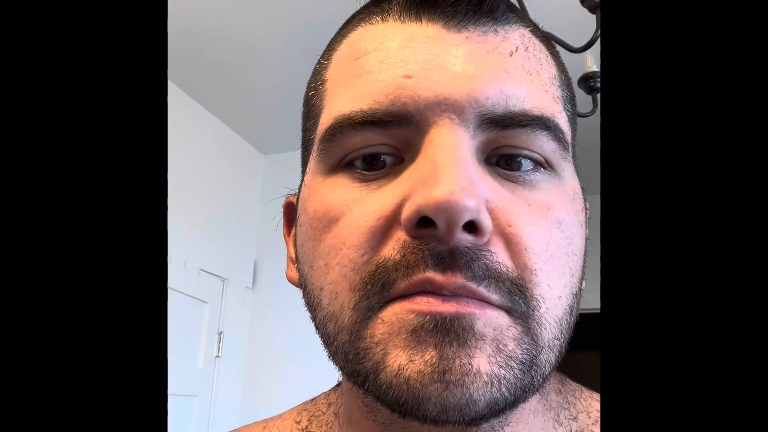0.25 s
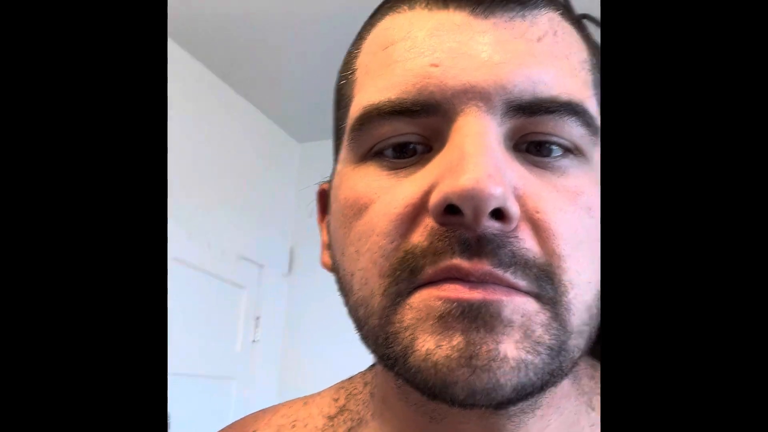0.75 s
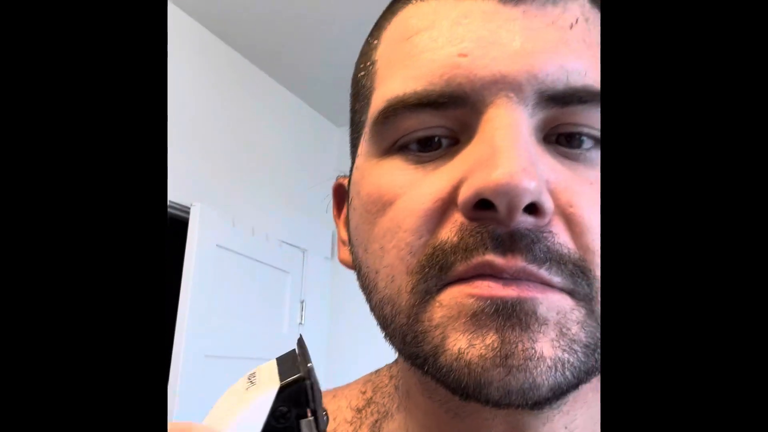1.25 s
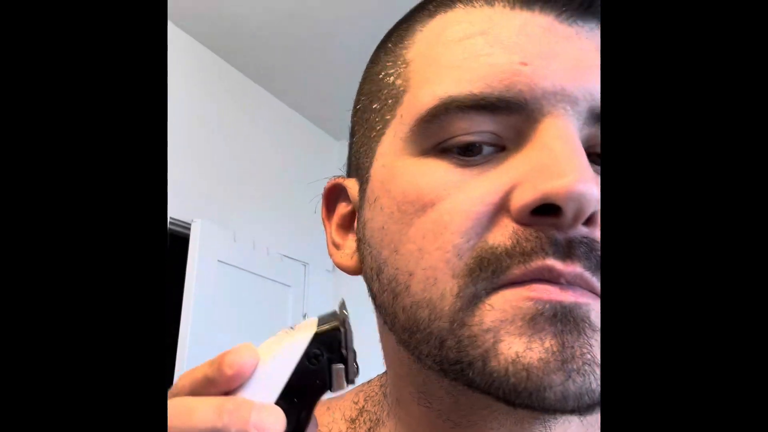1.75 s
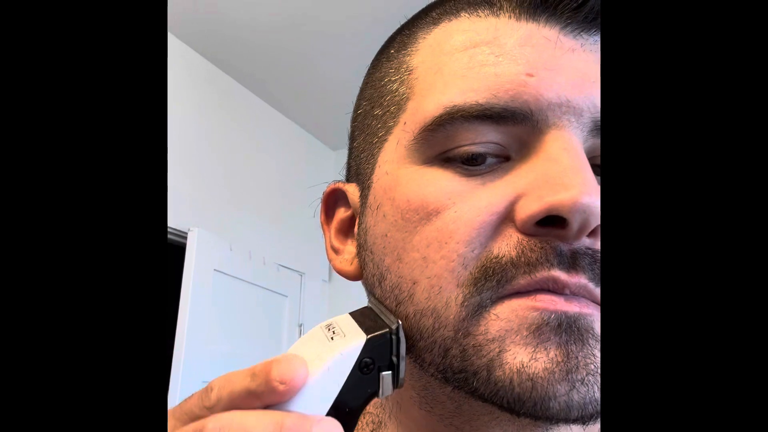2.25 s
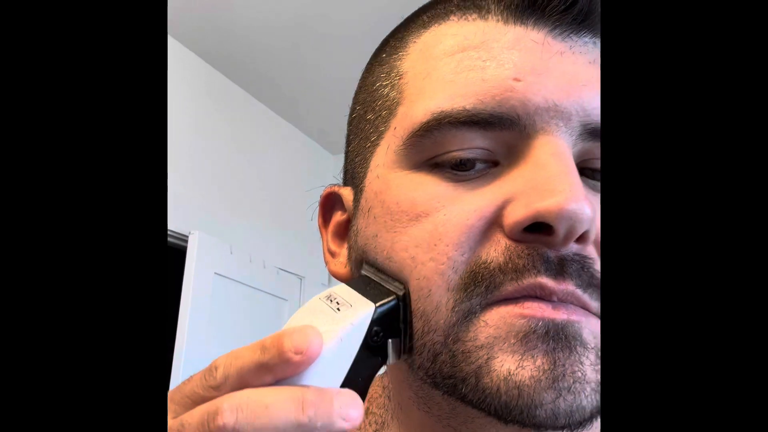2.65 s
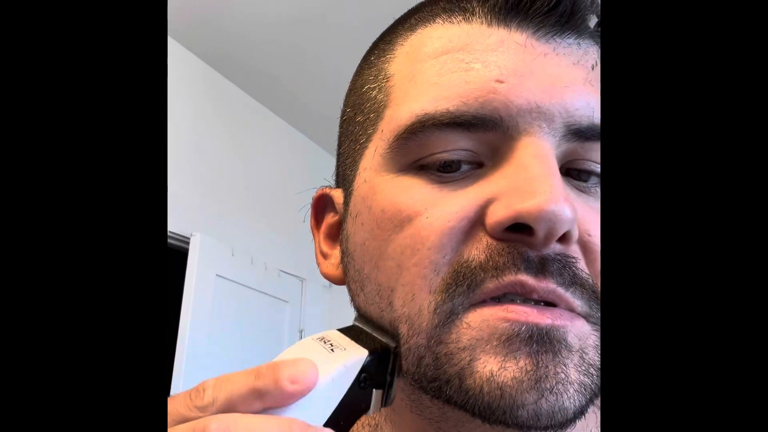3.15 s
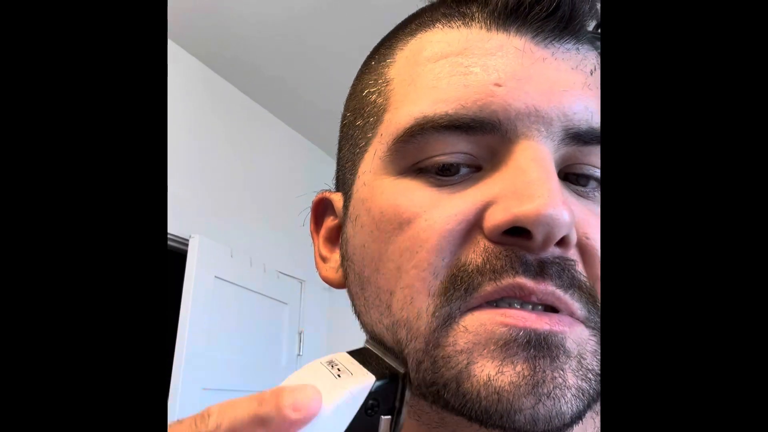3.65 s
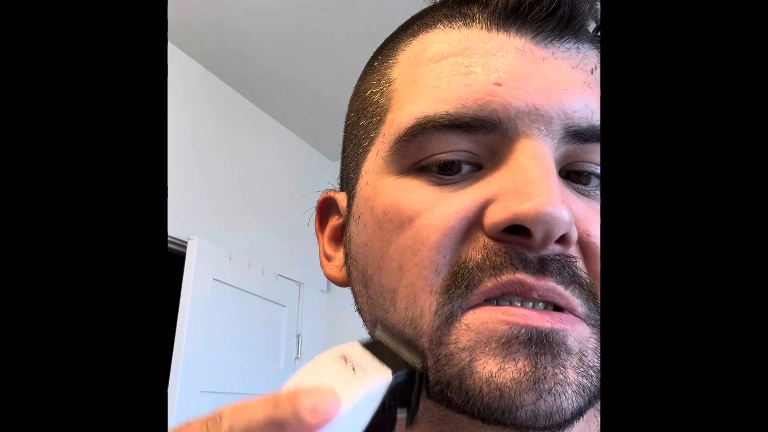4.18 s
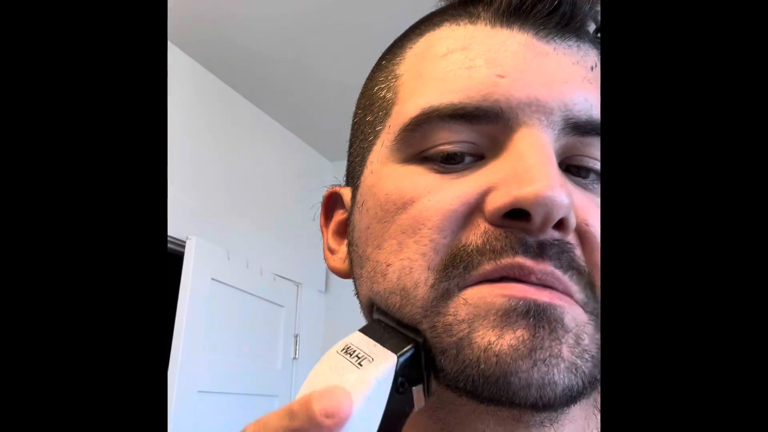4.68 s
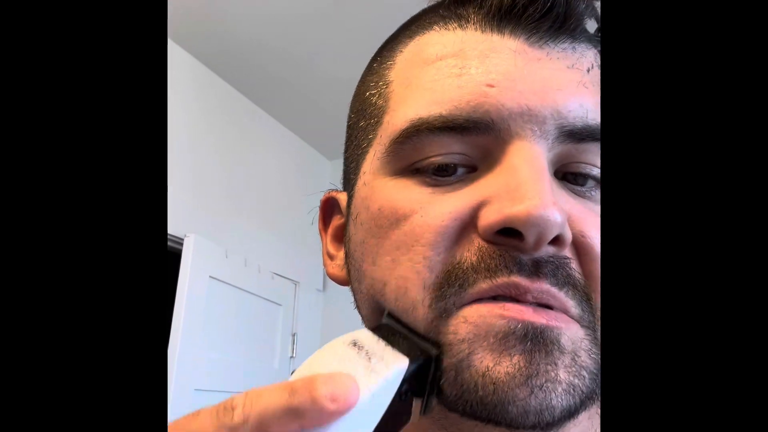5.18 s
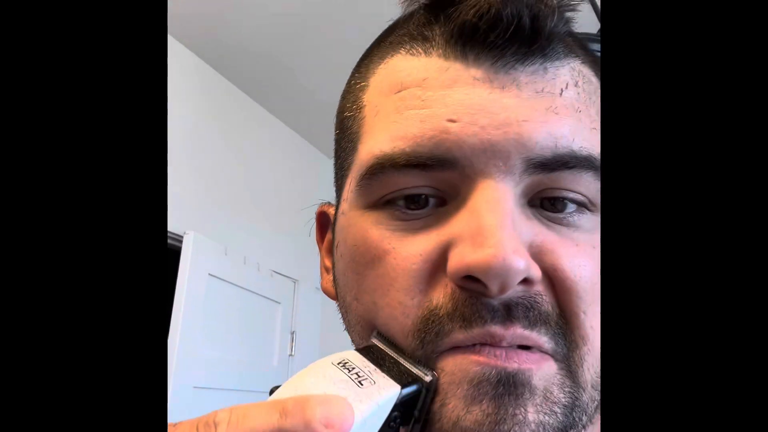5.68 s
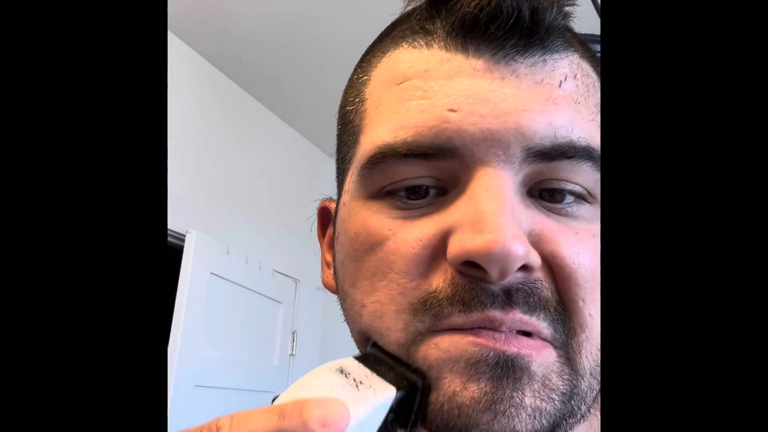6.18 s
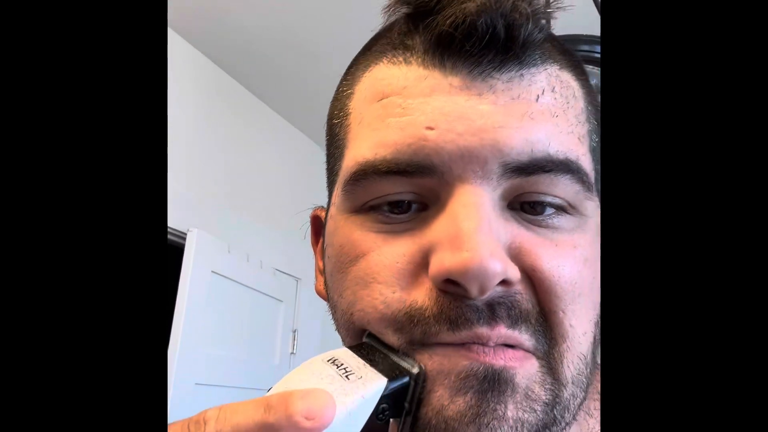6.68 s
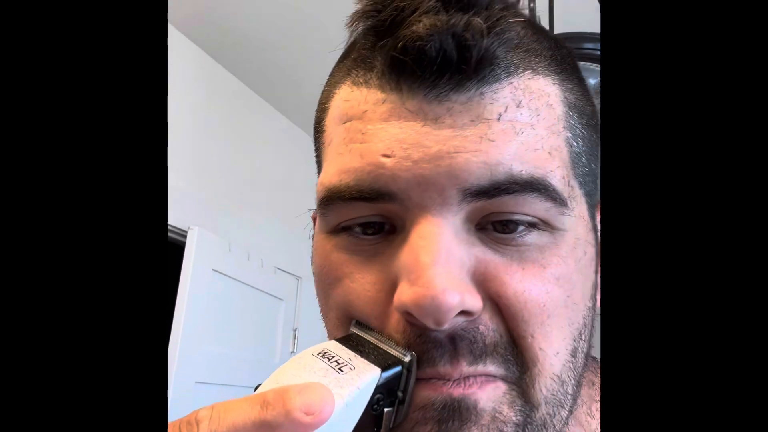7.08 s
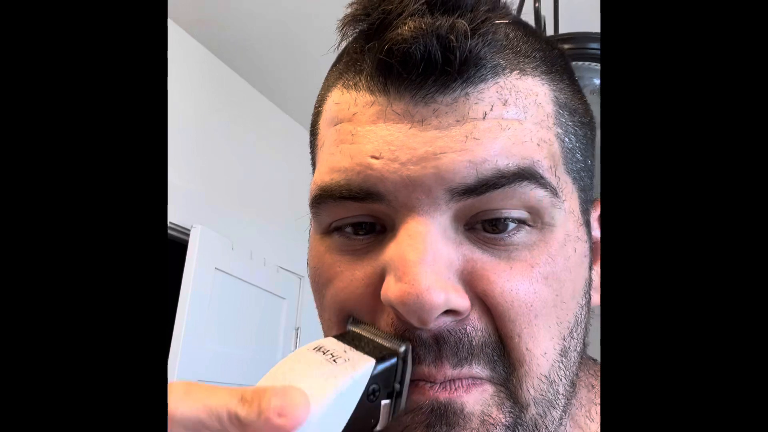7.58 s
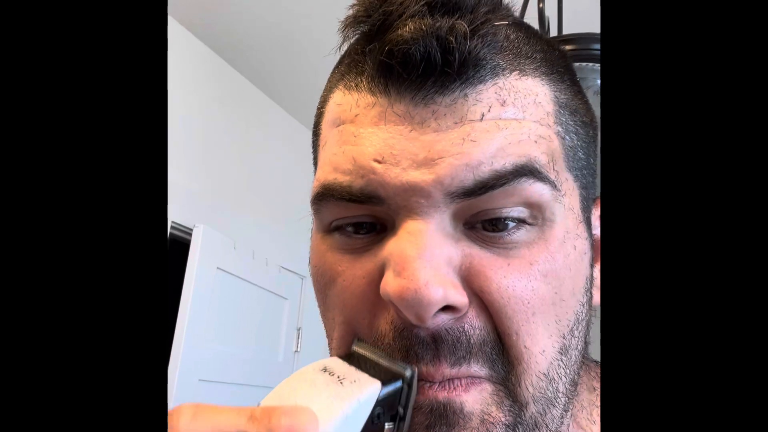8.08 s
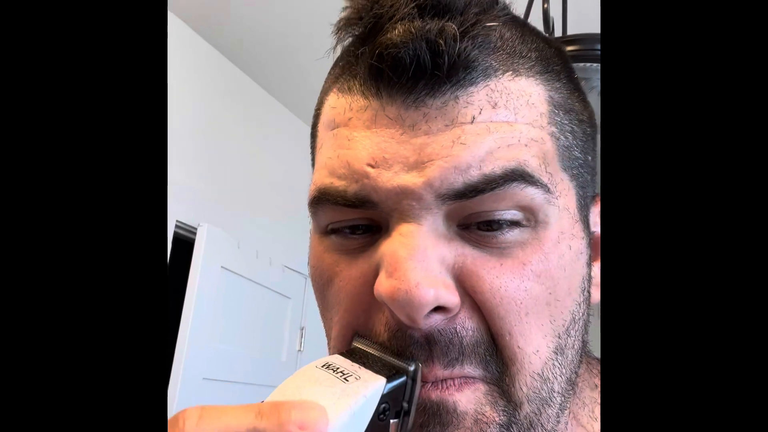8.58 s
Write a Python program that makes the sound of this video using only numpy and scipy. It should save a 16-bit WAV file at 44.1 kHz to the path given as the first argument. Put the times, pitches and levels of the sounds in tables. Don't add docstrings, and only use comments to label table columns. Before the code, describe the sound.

Electric hair clippers buzz loudly beside the microphone, swing away, then stroke through a beard with crackling, rasping hair in a small hard room.

```python
import sys
import numpy as np
from scipy import signal
from scipy.fft import rfft, irfft, next_fast_len
from scipy.io import wavfile
from scipy.ndimage import uniform_filter1d

SR = 44100
rng = np.random.default_rng(int(sys.argv[2]) if len(sys.argv) > 2 else 0)


def invert_db(x):
    u = np.asarray(x, float) / 20
    return 10 ** u


def int16_out(signal):
    q = np.round(np.clip(np.atleast_2d(signal).T, -1, 1) * 32767)
    wavfile.write(sys.argv[1], SR, q.astype(np.int16))


N = 389844
STROKE_HZ = 119.96
SOUND_M_S = 343


def evened(x):
    return x / np.sqrt(np.mean(abs(x) ** 2) + 1e-20)


def read(points, hz):
    f, value = np.transpose(points)
    return np.interp(np.log(hz + 1), np.log(f + 1), value)


def curves(rows, t):
    s, *columns = np.transpose(rows)
    return [np.interp(t, s, column) for column in columns]


def plateau(t, start, held, rise, fall):
    return -rise * np.maximum(start - t, 0) - fall * np.maximum(t - start - held, 0)


def drift(shape, span):
    size = max(round(span), 1)
    return evened(uniform_filter1d(uniform_filter1d(rng.standard_normal(shape), size), size))


def colour(x, points):
    gain = np.log(invert_db(read(points, abs(np.fft.fftfreq(4096, 1 / SR)))))
    response = np.fft.ifft(np.exp(gain - 1j * signal.hilbert(gain).imag)).real[:2048]
    return signal.oaconvolve(x, response)[:N]


def shaped_noise(points):
    gain = invert_db(read(points, np.fft.rfftfreq(N, 1 / SR)))
    return evened(irfft(rfft(rng.standard_normal(N)) * gain, N))


def resonate(x, hz, width):
    turn = np.exp(2j * np.pi * np.cumsum(hz * np.ones(len(x))) / SR)
    r = np.exp(-np.pi * width / SR)
    return 2 * (turn * signal.lfilter([1 - r], [1, -r], x / turn + 1e-18)).real


# (time [s], grip [0-3])
GRIP = [
    (0, 0),
    (.35, 0),
    (.55, 1),
    (1.54, 1),
    (1.62, 2),
    (2.25, 2),
    (2.45, 3),
    (8.84, 3),
]


def by_grip(values, t):
    return np.interp(curves(GRIP, t)[0], range(len(values)), values)


def closeness(t):
    return np.maximum(1 - curves(GRIP, t)[0], 0)


# (time [s], armature hum [dB], knock of casing and blades [dB])
HAND = [(0, -34.5, -16.5), (.15, -39.5, -18.5), (.33, -40.5, -23), (.4, -42, -32.5), (.47, -43.5, -37),
        (.6, -41.5, -43), (.95, -43.5, -42.5), (1.3, -41, -39.5), (1.54, -38.5, -41.5), (1.64, -41, -46),
        (2.2, -41.5, -45), (3.15, -42.5, -46.5), (4.1, -41, -44), (5.2, -40.5, -42.5), (6.2, -38, -40.5),
        (6.9, -37, -39.5), (7.6, -36, -39), (8.84, -35.5, -37)]


def hand_db(t):
    return curves(HAND, t)


# (time [s], from the casing [m], from the blades [m])
PATH = [(.34, 0, 0), (.6, .6, .14), (2.3, .6, .1), (2.6, .75, -.15), (5.6, .8, -.22), (7.7, .43, -.36),
        (8.84, .43, -.36)]


def extra_path_m(t):
    return curves(PATH, t)


IDLE_DB = [
    -15.,
    -13.5,
    -14.,
    -9.,
]
# (time of full cut [s], held [s], level [dB])
STROKES = [(2.44, 0.31, -45), (3.11, 0.02, -45.5), (3.29, 0.071, -41.5), (3.62, 0.089, -45),
           (3.87, 0.11, -39), (4.28, 0.095, -40), (4.58, 0.37, -39.5), (5.04, 0.15, -45),
           (5.331, 0.19, -40.5), (5.839, 0.037, -35), (6.322, 0.073, -38.5), (6.55, 0.18, -41),
           (6.999, 0.0059, -34), (7.15, 0.036, -38.5), (7.32, 0.027, -45), (7.549, 0.015, -31),
           (7.92, 0.071, -36), (8.298, 0.019, -34.5), (8.43, 0.028, -43), (8.61, 0.13, -36)]


def cutting(t):
    bite_db_per_s, lift_db_per_s = 85, 103
    idle_db = hand_db(t)[1] + by_grip(IDLE_DB, t)
    power = invert_db(idle_db) ** 2
    for s, held, db in STROKES:
        power = power + invert_db(db + plateau(t, s, held, bite_db_per_s, lift_db_per_s)) ** 2
    return idle_db, 10 * np.log10(power)


# (frequency [Hz], phase [rad])
PORTS = [(240, 0), (360, -.3), (480, -1.3), (600, -.1), (720, -.7), (960, 0), (1200, -.3), (1500, -1.3),
         (2160, -1.1), (2280, -2.3), (2640, -3.3), (3880, -5.6), (6460, -4.8), (7500, -4), (8050, -np.pi),
         (9900, -np.pi), (10250, -2.45), (11200, -2.2), (11900, -.7), (12500, 0)]
# (frequency [Hz], level [dB])
LEAN = [(240, 0), (360, 3.5), (480, 1), (600, 2), (720, -1.5), (840, -6), (960, -3), (1080, 1.5), (1680, 4),
        (1900, .5), (2700, -2), (4500, -2), (6500, 0)]
# (frequency [Hz], share [0-1])
DIRECT = [(300, 1.0), (1000, .95), (2000, .75), (4500, .6), (6500, .8), (7500, .85), (8050, 1), (10200, 1),
          (10700, .99), (11500, .8), (12100, .85), (12800, 1)]


def ports(hz, walls):
    direct = np.clip(read(DIRECT, hz), 0, 1)
    half = invert_db(read(LEAN, hz) / 2) * np.exp(.5j * np.interp(hz, *np.transpose(PORTS)))
    return direct * np.array([half, 1 / half]) + np.sqrt(1 - direct ** 2) * walls


def room(x, t60=0.17):
    size = next_fast_len(N + SR)
    tails = rng.standard_normal((2, SR // 2)) * invert_db(-60 * np.arange(SR // 2) / SR / t60)
    walls = rfft(tails / np.linalg.norm(tails[0]), size)
    return irfft(rfft(x, size) * ports(np.fft.rfftfreq(size, 1 / SR), walls), size)[:, :N]


# (frequency [Hz], level [dB per Hz])
RUMBLE = [(15, -11), (35, -11), (75, 4), (110, 2), (150, 8), (190, -5.5), (300, -10), (450, -4.5),
          (800, -29)]
# (time [s], level [dB], pitch [Hz])
DRONE = [
    (1.25, -79.5, 460),
    (1.45, -54.5, 407),
    (1.65, -56, 369),
    (1.9, -54.5, 348),
    (2.1, -59, 330),
    (2.25, -60, 312),
    (2.5, -72, 265),
]


def background():
    t = np.arange(N) / SR
    rumble_db = hand_db(np.maximum(t, .5))[0] - 21.5 + 2 * drift(N, 16000)
    rumble = invert_db(rumble_db) * shaped_noise(RUMBLE)
    drone_db, drone_hz = curves(DRONE, t)
    drone = resonate(rng.standard_normal(N), drone_hz, 45)
    drone = invert_db(drone_db) * evened(resonate(drone, drone_hz, 45))
    draught = invert_db(hand_db(t)[0] - 31) * shaped_noise([(12, -8), (35, 0), (70, -10), (140, -18)])
    return draught * [[1.6], [-0.6]] + rumble + drone


# (time [s], level [dB], ring [Hz], t60 [s])
KNOCKS = [
    (4.001, -40, 215.7, 0.025),
    (7.546, -10, 1230, 0.0041),
    (7.546, -21, 2100, 0.024),
    (7.547, -37, 604, 0.015),
    (7.566, -34, 4080, 0.15),
]


def jaw_knocks():
    out, t = np.zeros(N + 4000), np.arange(4000) / SR
    for s, db, hz, t60 in KNOCKS:
        onset = np.minimum(t / 0.00035, 1)
        out[round(s * SR):][:4000] += invert_db(db - 60 * t / t60) * np.sin(2 * np.pi * hz * t) * onset
    return out[:N]


# (time [s], peak [dB])
CRACKS = [(2.3261, -43), (2.8582, -48), (3.2545, -34), (3.4503, -35), (4.9861, -35), (5.0594, -36),
          (5.3852, -34), (5.447, -29), (6.127, -30), (6.2891, -31), (6.556, -26), (6.7017, -30),
          (8.2726, -47), (8.6373, -34), (8.8024, -31)]


def hair_cracks():
    clicks = np.zeros((2, N))
    for s, db in CRACKS:
        lean_db = rng.uniform(3, 6)
        clicks[:, round(s * SR)] = invert_db(db + 2.5 + lean_db * np.array([1, -1])) * [1, -1]
    splinter = rng.standard_normal(400) * invert_db(-60 * np.arange(400) / SR / 0.0062)
    splinter = splinter / np.linalg.norm(splinter)
    bright = [(1500, -20), (4500, 0), (9500, 9.0), (13000, 0), (16000, -4)]
    return np.array([colour(signal.oaconvolve(c, splinter), bright) for c in clicks])


# (time [s], peak [dB], ring [Hz])
FLICKS = [(2.3597, -32, 3970), (3.3894, -40, 3700), (3.5974, -33, 3670), (3.8438, -29.5, 3800),
          (4.6101, -27, 3650), (5.4055, -22.5, 4390), (5.826, -31, 3900), (5.8438, -25, 3880),
          (6.0884, -29, 3750), (6.2429, -30, 4480), (6.41, -30, 3780), (6.5477, -27, 4410),
          (6.6026, -28, 3860), (6.9722, -29, 3400), (7.1733, -33, 4170), (7.205, -34, 4080),
          (7.4307, -44, 4070), (7.5659, -27, 4140), (7.5978, -36, 4100), (7.8352, -31, 4110),
          (7.935, -34, 4080), (7.9774, -28, 4150), (8.2558, -35, 4050), (8.294, -22, 4000),
          (8.4535, -28, 4070), (8.5855, -40, 4600), (8.605, -32, 4040), (8.636, -24, 4180),
          (8.6812, -24, 4180), (8.8031, -30, 3760)]


def flicks():
    t60_s, trim_db = 0.025, -1.5
    out, t = np.zeros(N + 2000), np.arange(2000) / SR
    for s, db, hz in FLICKS:
        ring = np.sin(2 * np.pi * hz * t)
        ring = ring + 0.51 * np.sin(2 * np.pi * 1.09 * hz * t) + 0.47 * np.sin(2 * np.pi * 0.9 * hz * t)
        onset = np.minimum(t / 0.0008, 1)
        out[round(s * SR):][:2000] += invert_db(db + trim_db - 60 * t / t60_s) * ring * onset
    return out[:N]


# (frequency [Hz], width [Hz], level [dB])
TEETH = [(2757, 870, -15.5), (3773, 260, -13), (4290, 700, -19.5), (6010, 690, -17.5), (13100, 1200, -27.5),
         (4550, 400, -10)]
# (time [s], pitch ratio [1])
TILT = [(0, 1), (6.6, 1), (7.3, 1.08), (8.84, 1.09)]


def tooth_rings(hair):
    tilt = curves(TILT, np.arange(N) / SR)[0]
    total = np.zeros(N)
    for hz, width, db in TEETH:
        pitch = hz * tilt if hz < 4000 and width < 500 else hz
        ring = resonate(np.roll(hair, round(hz)), pitch, width)
        total += invert_db(db + 4.1 * drift(N, 550)) * evened(ring)
    return total


CLACK_S = .0017
# (time [s], contact [0-1])
CONTACT = [(0, 0), (2.25, 0), (2.4, 0.99), (8.84, 1)]
# (frequency [Hz], level [dB per Hz])
SNAP = [(300, -37), (1000, -12.5), (1600, -7.5), (2600, 2.5), (3300, -3.5), (4100, -2.5), (5000, -19),
        (6200, -9), (8300, -12), (9500, -10), (10800, -52), (12000, -102), (13000, -40), (14200, -24),
        (15800, -33)]
# (frequency [Hz], level [dB per Hz])
RATTLE = [(300, -21), (1200, -6.5), (2600, 2.5), (3800, 0), (5200, -4), (6800, 0.5), (8000, -9),
          (9500, -14), (11000, -12), (12500, -29), (14200, -39), (15800, -59)]
# (frequency [Hz], level [dB per Hz])
SCRAPE = [(80, -59), (200, -15), (350, 0), (500, 16), (900, 4), (1500, 12.5), (1900, 17.5), (2400, -9)]
# (frequency [Hz], level [dB per Hz])
GLARE = [(4000, -32), (6500, 9.5), (9000, 7.5), (10800, -8), (12000, -6.5), (15500, -9)]


def blades(snaps_per_s=3500, spread_db=3.0, gate=0.78, dense=0.64):
    t = np.arange(N) / SR
    cut_db = np.interp(t, t[::256], cutting(t[::256])[1])
    close = closeness(t)
    contact = np.clip(curves(CONTACT, t)[0], 0, 1)
    stroke = 2 * np.pi * STROKE_HZ * (t - CLACK_S - extra_path_m(t)[1] / SOUND_M_S) - 2.6
    crossing = 1 - gate / 2 + 3.0 * gate * np.exp(3.5 * (np.cos(stroke) - 1))

    sizes = invert_db(spread_db * np.minimum(rng.exponential(1, N), 4)) * rng.choice([-1, 1], N)
    snaps = evened(sizes * (rng.random(N) < snaps_per_s / SR * np.maximum(crossing, 0)))
    hiss = rng.standard_normal(N) * crossing
    hair = invert_db(2.4 * drift(N, 340)) * (snaps + dense * evened(hiss))
    in_hair = evened(evened(colour(hair, SNAP)) + tooth_rings(hair))
    empty = evened(colour(hiss, RATTLE))
    cut = invert_db(cut_db) * (contact * in_hair + (1 - contact) * empty)

    glare_noise = evened(colour(hiss + 2.8 * rng.standard_normal(N), GLARE))
    glare = close * invert_db(hand_db(t)[1] - 11) * glare_noise
    scrape_db = -52 + 1.52 * (cut_db + 40.5) - 14.0 * close
    return glare + cut + invert_db(scrape_db) * evened(colour(hiss + 0.14 * snaps, SCRAPE))


FRAME, HOP = 2940, 735
ORDER = np.arange(1, 132)[:, None]
COMB = (ORDER == 18) | (ORDER == 19)
COMB_STEADY = np.where(COMB, .3, 1)
# (multiple [1], beside the microphone [dB], swung away [dB], raised [dB], on the face [dB])
CASING = [(2, -35.0, -20.0, -20.0, -17.0), (3, -27.0, -20.0, -12.0, -15.0), (4, -23.0, -14.0, -11.0, -11.0),
          (5, -11.0, -12.0, -12.0, -13.0), (6, -16.0, -9.0, -23.0, -20.0), (7, -17.0, -13.0, -19.0, -13.0),
          (8, -17.0, -15.0, -23.0, -10.0), (9, -14.0, -18.0, -15.0, -10.0),
          (10, -18.0, -12.0, -17.0, -17.0), (11, -10.0, -15.0, -13.0, -15.0),
          (12, -13.0, -18.0, -25.0, -14.0), (13, -15.0, -12.0, -14.0, -13.0),
          (14, -11.0, -21.0, -16.0, -14.0), (15, -19.0, -14.0, -17.0, -22.0),
          (16, -17.0, -22.0, -24.0, -20.0)]
# (multiple [1], beside the microphone [dB], swung away [dB], raised [dB], on the face [dB])
BLADE = [(17, -22.0, -26.0, -26.0, -21.0), (18, -20.0, -15.0, -17.0, -12.0),
         (19, -20.0, -17.0, -18.0, -10.0), (20, -8.0, -13.0, -14.0, -16.0), (21, -16.0, -8.0, -16.0, -13.0),
         (22, -7.0, -11.0, -17.0, -15.0), (23, -20.0, -10.0, -16.0, -20.0),
         (24, -20.0, -12.0, -11.0, -16.0), (25, -19.0, -20.0, -19.0, -25.0),
         (26, -14.0, -20.0, -22.0, -18.0), (27, -20.0, -19.0, -20.0, -15.0),
         (28, -20.0, -17.0, -16.0, -24.0), (29, -17.0, -17.0, -19.0, -16.0),
         (30, -15.0, -9.0, -18.0, -20.0)]
# (frequency [Hz], level [dB])
UPPER = [(3700, -13.5), (4500, -23), (5300, -28), (7000, -29), (9500, -36), (11000, -55), (13000, -40),
         (15600, -37)]
# (frequency [Hz], level [dB])
UPPER_CLOSE = [(3700, -15), (4400, -21), (4900, -30), (5160, -16), (5500, -34), (6000, -20.5), (6450, -20),
               (6800, -37), (8400, -42), (10300, -31), (11500, -61), (15600, -49)]
BLADE_DB = [
    2,
    -1.5,
    1,
    1.5,
]
# (time [s], order 18 [dB], order 19 [dB])
WHINE = [(0, -17, -12), (.2, -22, -18), (.28, -6.5, -14), (.5, -18, -12), (.85, -17, -8), (1.15, -12, -14),
         (1.4, -9, -14), (1.7, -15, -17), (2.3, -14, -16), (2.5, -14, 0), (2.85, -3.5, -20),
         (3.25, -6.5, -19), (3.5, -3, -17), (4.2, -8, -6), (4.5, -18, -1), (4.7, -13, -3), (5.3, -24, -7),
         (5.6, -14, 1), (5.76, -12, -5), (5.95, -9, 2), (6.2, -11, 3), (6.3, -18, -10), (6.45, -13, -4),
         (7.05, -5.5, -1), (7.2, -14, -12), (7.7, -7.5, -14), (7.8, -23, -18), (7.95, -13.5, -12),
         (8.84, -5, -5)]
# (time [s], length [s], level [dB], centre [Hz], spread [octaves])
PRESSES = [(0.3, 0.099, 7.5, 1760, 0.43), (0.34, 0.037, 7.5, 2620, 0.17), (0.27, 0.029, 3.5, 3000, 0.21),
           (0.29, 0.027, 6, 4450, 0.028), (1.61, 0.2, 10.5, 2400, 0.026), (2.8, 0.38, 3.5, 3700, 0.32),
           (.7, 0.82, 0, 720, .08), (6.0, 0.22, 9, 3720, .03), (6.0, 0.33, -8, 2640, 0.036),
           (7.65, 0.73, 9, 2500, 0.062), (8.0, 0.5, -17, 3240, .03), (2.75, 0.88, 8, 2460, 0.071),
           (0.44, 0.22, -7, 680, 2.2), (0.439, 0.17, 14.5, 1850, 0.61), (1.18, 0.26, 10.5, 3160, 0.15),
           (1.57, 0.17, 10, 2420, 0.035), (1.45, 0.23, 2, 2000, 0.44), (4.307, 0.3, 11, 514, 0.28),
           (7.2, 0.56, 6.5, 1300, 0.23), (7.194, 0.26, 5, 1930, 0.63), (7.205, 0.12, 10.5, 610, 0.67),
           (7.196, 0.19, -21, 363, 0.19), (12, 0.64, 5, 450, 0.19), (1.9, 0.7, 3, 2880, .03),
           (7.62, 0.34, -13, 1920, .03), (8.03, .2, -7, 4100, .15), (2.3, .25, 4.5, 2880, 0.026),
           (3.7, 0.66, 14, 2880, .03), (2.8, 0.3, 9, 2660, .07), (4.4, 1.28, 8.5, 3700, 0.086),
           (0.89, 0.17, 7.5, 4000, 0.12), (7.6, 0.86, 15, 1950, 0.095), (3.1, 0.2, 7, 1900, .04)]


def order_levels(t):
    hum_db, knock_db = hand_db(t)
    idle_db, cut_db = cutting(t)
    uppers = [UPPER_CLOSE, UPPER, UPPER, UPPER]
    grips = np.transpose(CASING + BLADE)[1:]
    table = np.array([np.r_[0, low, read(up, 120. * ORDER[30:, 0])] for low, up in zip(grips, uppers)])
    db = np.array([by_grip(row, t) for row in table.T]) + np.where(ORDER > 1, knock_db, hum_db)
    load_db = 0.28 * (cut_db - idle_db)
    db = db + (ORDER > 16) * ~COMB * (by_grip(BLADE_DB, t) - load_db)
    db[17:19] = knock_db + np.array(curves(WHINE, t))
    for s, held, boost_db, hz, octaves in PRESSES:
        bell = np.exp(-(np.log2(STROKE_HZ * ORDER / hz) / octaves) ** 2)
        db = db + boost_db * invert_db(plateau(t, s, held, 660, 154)) * bell * (ORDER > 2)
    return db


def order_sizes(db, t, wander_db=3.0):
    grip = curves(GRIP, t)[0]
    steady = np.minimum(.4 + grip, 1) * COMB_STEADY
    loose_db = steady * (wander_db * drift(db.shape, 8) + 2.5 * drift(db.shape, 46) * (ORDER > 30))
    flicker = np.minimum(ORDER / 25, 1) * np.minimum(0.12 + grip, 1) * (1 - 0.2 * COMB * (grip > 2))
    loose_db = loose_db + 3.4 * drift(db.shape, 3) * flicker
    swing = invert_db(plateau(t, .19, .53, 150, 110))
    loose_db = loose_db + 7.5 * drift(db.shape, 2) * swing * (ORDER > 3)
    crest_db = 4.5
    size = invert_db(db + np.minimum(loose_db, crest_db * np.tanh(loose_db / crest_db)))
    for low, high in [(0, 1), (1, 7), (7, 16), (16, 131)]:
        part = slice(low, min(high, 60))
        size[low:high] *= np.linalg.norm(invert_db(db[part]), axis=0) / np.linalg.norm(size[part], axis=0)
    size[0] *= invert_db(0.28 * drift(t.shape, 5))
    return size


def order_phases(t, scatter=0.66, jitter=0.022):
    grip, close = curves(GRIP, t)[0], closeness(t)
    shape = (len(ORDER), len(t))
    unrest = jitter * (.3 + 2.16 * np.minimum(grip / 2, 1))
    slip = 2 * np.pi * (STROKE_HZ - 120) * t - 2.7 + unrest * drift(t.shape, 2)
    casing_m, blades_m = extra_path_m(t)
    clack = (ORDER > 21) * (grip < .5) | (ORDER > 26)
    delay_s = np.where(clack, CLACK_S + blades_m / SOUND_M_S, casing_m / SOUND_M_S)
    slip = slip - 2 * np.pi * STROKE_HZ * delay_s * (ORDER > 1)

    blur = 2 - close
    tight = .22
    fixed_spread = np.cumsum(rng.standard_normal(ORDER.shape) * np.where(ORDER > 26, tight, 1), 0)
    moving = 0.55 * drift(shape, 36) * (ORDER > 1) * np.where(ORDER > 26, 2 * tight, 1)
    ring = scatter * blur * (fixed_spread + moving)
    ring = ring + 0.55 * close * np.cumsum(rng.standard_normal(ORDER.shape) * (ORDER > 26), 0)
    ring = ring + 1.1 * drift(shape, 1) * invert_db(plateau(t, .38, .2, 200, 80)) * (ORDER > 7)
    return ORDER * slip + ring + np.pi * (ORDER == 1)


# (time [s], share [0-1])
ASIDE = [(0, 0.25), (.5, 0.9), (1.9, 1), (2.05, 0.01), (8.84, 0.08)]


def order_ports(t):
    close, shape = closeness(t), (2, len(ORDER), len(t))
    walls = (drift(shape, 14.3) + 1j * drift(shape, 11.0)) * .42 * COMB_STEADY
    walls = walls * (.5 + np.where(ORDER > 26, 0.6, 0.8) * (1 - close))
    near = close * (-1.1j * (ORDER > 4) * (ORDER < 8) + .65j * (ORDER > 20) * (ORDER < 24))
    bass = (0.25 + .45j) * curves(ASIDE, t)[0] * (ORDER < 3)
    aside = np.exp(np.array([1, -1])[:, None, None] * (bass + near))
    return ports(120. * ORDER + 0 * t, walls) * aside


def motor():
    t = np.arange(N // HOP + 3) * HOP / SR
    size = order_sizes(order_levels(t), t)
    z = np.zeros((2, FRAME // 2 + 1, len(t)), complex)
    z[:, 8 * ORDER[:, 0]] = size * np.exp(1j * order_phases(t)) * order_ports(t)
    return signal.istft(z, nperseg=FRAME, noverlap=FRAME - HOP)[1][:, :N] * 3 / 4 * np.sqrt(2)


# (time [s], share [0-1], extra path [m])
BOUNCE = [(.22, 0, .25), (.3, .25, .3), (.36, .55, .45), (.45, .5, .62), (.7, .45, .9), (.9, .15, .95),
          (1.15, .4, .9), (1.35, .6, .7), (1.55, .45, .55), (1.8, 0, .5)]


def swirl(x):
    t = np.arange(N) / SR
    share, path_m = curves(BOUNCE, t)
    late = np.array([np.interp(t - path_m / SOUND_M_S, t, c) for c in x])
    band = signal.butter(2, [900, 5000], "band", fs=SR, output="sos")
    bounce = signal.sosfilt(band, late)
    shake = 1 + .25 * drift(N, .004 * SR)
    return (x + share * shake * bounce) / np.sqrt(1 + .5 * share ** 2)


def scene():
    hair = room(blades() + flicks())
    return background() + jaw_knocks() + hair_cracks() + hair + swirl(motor())


def band_limit(x):
    return signal.sosfilt(signal.butter(12, 16690, fs=SR, output="sos"), x)


def record(dry):
    lowpass = signal.firwin(255, 15850, window=("kaiser", 9), fs=SR)
    limited = signal.oaconvolve(dry, lowpass[None], "same")
    return band_limit(limited)


dry = scene()
out = record(dry)
int16_out(out)
```